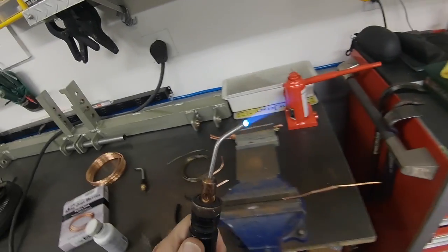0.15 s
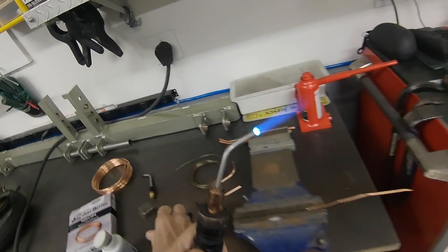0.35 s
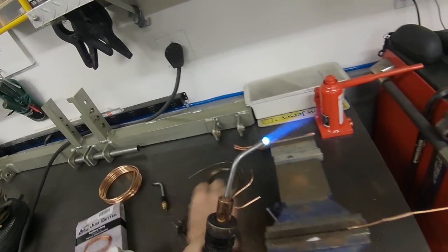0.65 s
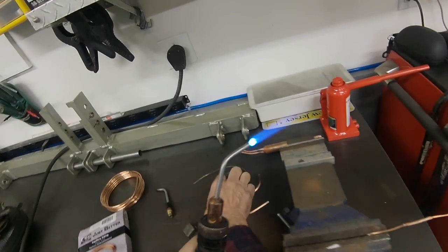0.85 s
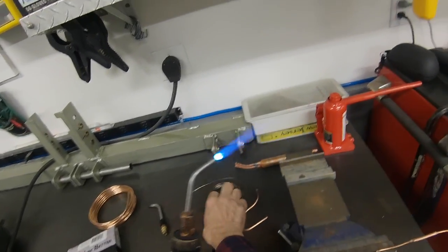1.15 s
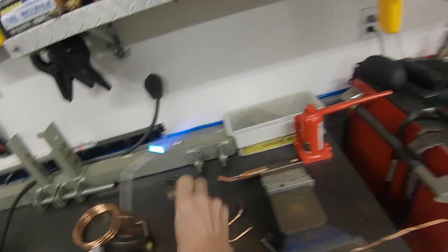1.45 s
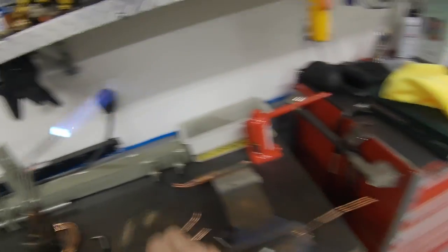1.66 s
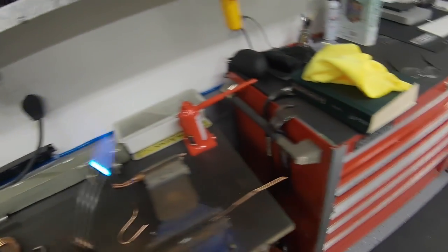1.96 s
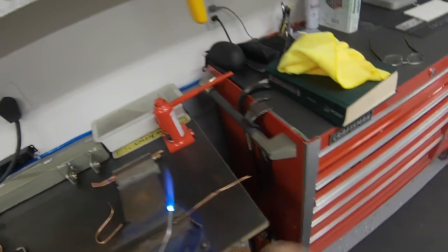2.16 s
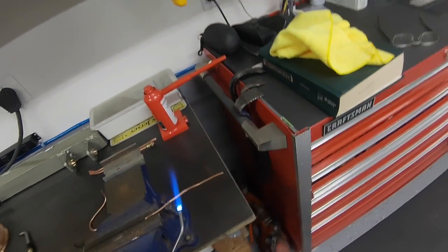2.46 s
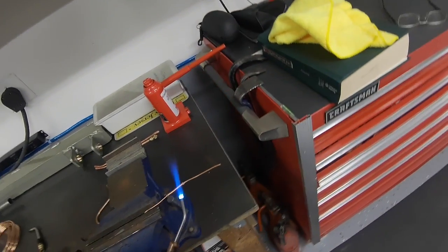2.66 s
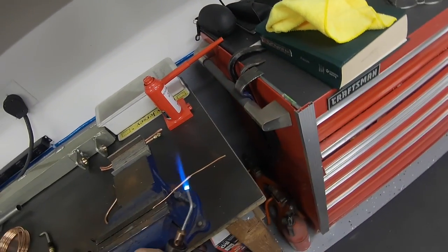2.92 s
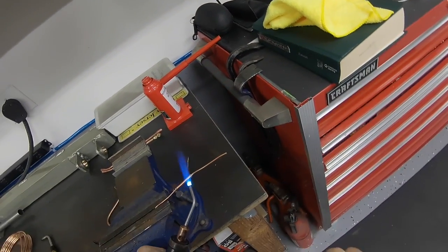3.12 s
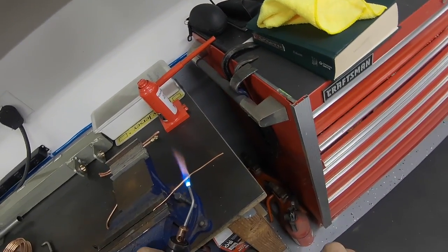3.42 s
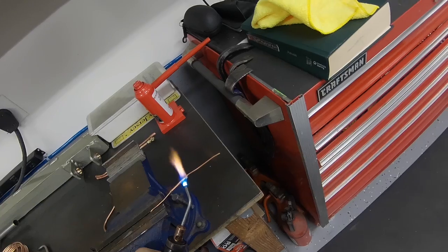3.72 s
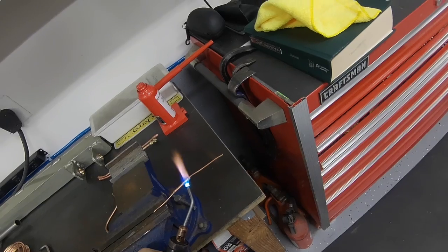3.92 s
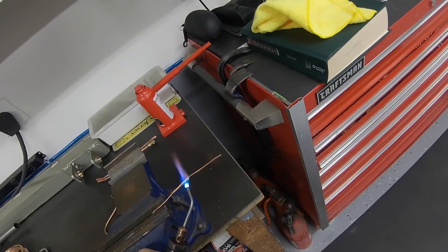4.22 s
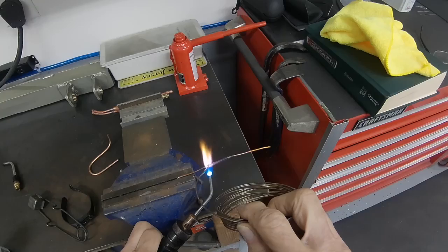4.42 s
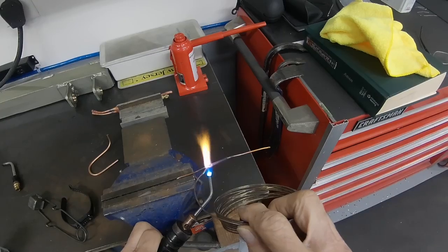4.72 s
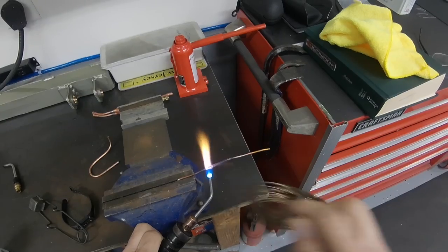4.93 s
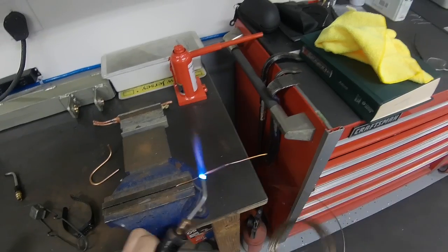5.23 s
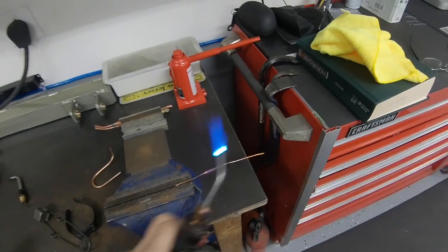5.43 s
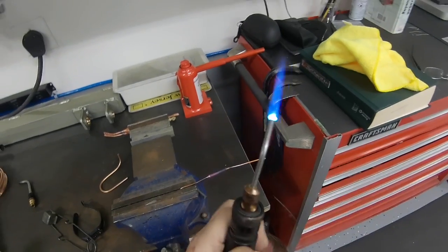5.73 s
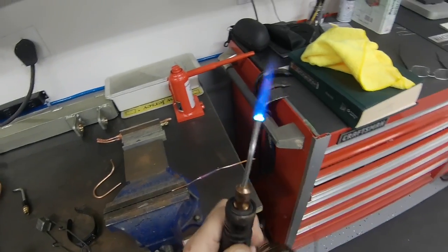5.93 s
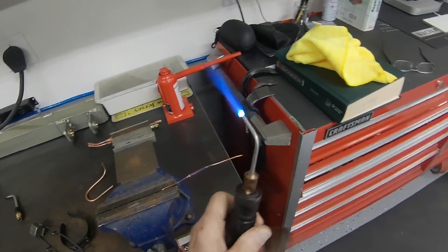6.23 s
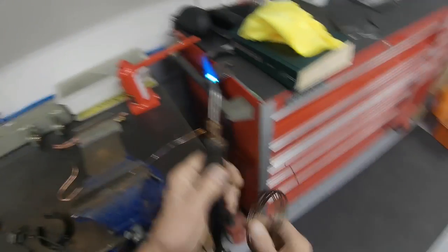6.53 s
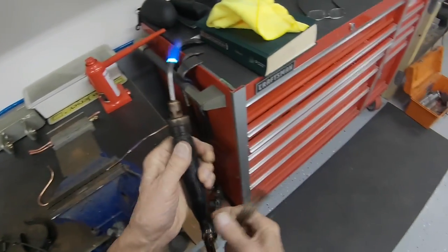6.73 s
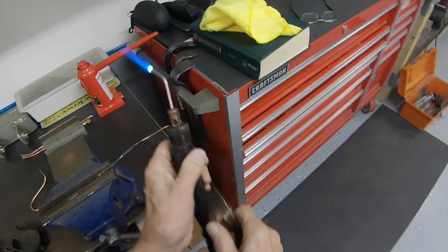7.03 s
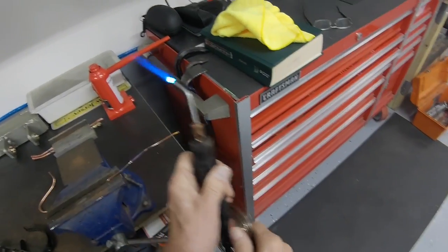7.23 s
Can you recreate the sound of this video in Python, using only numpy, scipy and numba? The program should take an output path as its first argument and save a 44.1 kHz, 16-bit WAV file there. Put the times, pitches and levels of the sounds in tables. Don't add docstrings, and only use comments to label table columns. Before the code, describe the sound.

A hand-held gas torch burns at a steel workshop bench, an arm's length from the listener. Bright rushing hiss and soft roar swell quickly, a single hard knock hits the bench top, and a shaky high whistle emerges and slides lower. The sound then shifts gently in colour as the torch passes over the bench, rises nearer and drops away. Faint low hum underneath; close head-worn stereo pickup with slightly lossy treble.

```python
import sys
import numpy as np
from scipy import signal
from scipy.fft import rfft, irfft, next_fast_len
from scipy.io import wavfile
from scipy.ndimage import uniform_filter1d, map_coordinates
from numba import njit

SR = 44100
rng = np.random.default_rng(int(sys.argv[2]) if len(sys.argv) > 2 else 0)


def nominal_scale(level):
    x = np.asarray(level, float) / 20
    return 10 ** x


def dump(signal):
    limited = np.clip(np.atleast_2d(signal).T, -1, 1)
    pcm = np.round(limited * 32767).astype(np.int16)
    wavfile.write(sys.argv[1], SR, pcm)


N = 325140
SIZE = next_fast_len(N)
TIME = np.arange(N) / SR
FREQ = np.maximum(np.fft.rfftfreq(SIZE, 1 / SR), 1)

# time in seconds, nearness in dB,
# turning of the nozzle to the listener in dB, fullness of the flame in dB.
FLAME_COURSE = [(0, -11.5, 1, -6), (.42, 3.5, 3, -2), (.68, 11, 5, 2.5), (.95, 8, 2.5, 3.5),
                (1.3, 1, 0.5, 5.5), (1.6, 2, 0, 4), (1.85, 1.5, -1, 2.5), (2.15, 1.5, 1.5, 2.5),
                (2.9, -7.5, 0.5, 0.5), (4.3, -6.5, 1.5, -0.5), (4.55, -3, 2.5, -2), (5.1, 0, 4, -3),
                (5.4, -0.5, -0.5, 2), (5.75, 9.5, 0, -0.5), (6.4, 2, 0.5, 0.5), (6.8, -10.5, -4, 0.5),
                (7.3, -4.5, 0.5, 1), (7.37, -20, -2, -4)]
# frequency in Hz, density in dB per Hz.
FLAME_DENSITY = [(150, -81.5), (300, -66.5), (550, -66), (800, -62), (1300, -63.5), (2600, -57),
                 (4000, -64), (5700, -57.5), (7000, -65), (7800, -63.5), (9200, -54.5), (11500, -52.5),
                 (12500, -55.5), (13500, -61), (15600, -70)]
# frequency in Hz, then the shares (ratios)
FLAME_SHARES = [(400, 0.26, -0.19, -0.13), (1110, 0.17, 0.11, 0.56), (5480, 0.69, -1.16, -0.37),
                (9000, 0.12, 0.91, -0.48), (11500, 0.15, 0.99, 0.81), (14500, 0.5, 0.31, 0.35)]
# start in seconds, end in seconds, side minus mid in dB.
OFF_CENTRE_SPELLS = [
    (1.063, 1.57, -4.5),
    (1.725, 2.74, -8),
    (4.917, 7.4, -8),
]
# start in seconds, end in seconds,
# first Hz, last Hz, depth as a ratio up to 1 (below 0 it reflects).
OBSTACLES = [(-.2, .6, 3160, 3320, 0.75), (0.4, 1.45, 12000, 13300, 0.53), (0.2, 1.03, 9700, 9300, 0.52),
             (-.2, .65, 14700, 14100, -1.1), (0.91, 1.5, 14600, 15500, .6), (0.753, 1.54, 4780, 5600, 0.87),
             (1.3, 2.2, 13900, 13900, 0.7), (1.6, 2.46, 9400, 8400, 0.42), (1.86, 4.497, 5500, 5630, 0.47),
             (2.24, 3.86, 13400, 16000, .85), (3.198, 5.304, 11800, 11550, 0.43),
             (4.4, 6.7, 4820, 4650, 0.52), (5.46, 6.0, 10400, 9800, 0.39), (6.16, 6.66, 9000, 11500, 0.12),
             (6.6, 7.4, 9300, 8900, 0.4), (6.94, 7.5, 15000, 12000, .5)]
# time in seconds, bench echo lag in ms,
# bench echo share from 0 to 1, wall echo lag in ms.
REFLECTORS = [(0, 1, 0, 4.9), (1.2, 0.57, 0.21, 3.65), (1.75, .8, 0, 4.4), (2.3, 0.75, 0.1, 4.8),
              (2.8, 0.72, 0.17, 5.5), (4.4, 0.54, 0.2, 5.48), (4.5, 0.66, 0.15, 5), (5.25, 0.79, 0.3, 4.6),
              (5.5, 1, .25, 4.76), (6.4, 1.01, 0.14, 4.26), (7.37, 1.23, 0.08, 4.27)]
# time in seconds, pitch in Hz, level in dB.
WHISTLE_COURSE = [(0, 4230, -36), (0.33, 4250, -31), (0.66, 4060, -14.4), (1.09, 3690, -13),
                  (1.15, 3545, -14), (1.54, 3566, -9.5), (1.79, 3370, -20.5), (2.0, 3625, -11.5),
                  (2.2, 3550, -13.5), (3.15, 3458, -16.3), (4.44, 3510, -17.5), (4.49, 3285, -14.5),
                  (5.42, 3275, -14), (5.53, 3335, -18.5), (6.1, 3245, -18), (6.55, 3330, -19),
                  (7.1, 3270, -16.3), (7.37, 3300, -21)]
# start in seconds, hold in seconds,
# release in seconds, pitch in Hz, level in dB.
EDGE_ROARS = [
    (-.1, 0.15, 3.9, 1820, -30),
    (4.428, 0.083, 3.0, 1765, -30),
    (5.45, .8, 0.78, 1680, -28),
    (6.503, .9, .1, 1780, -33),
]
# frequency in Hz, level in dB.
HUM_TONES = [(63, -49.5), (126.5, -61.5)]
# frequency in Hz, density in dB per Hz.
RUMBLE_DENSITY = [(20, -70.5), (60, -66.5), (130, -77.5), (200, -99.5), (400, -82)]
# frequency in Hz, level in dB, time to fall 60 dB in seconds.
BENCH_MODES = [(130, -16.5, 0.27), (338, -16, 0.094), (542, -36, .15), (873, -12.5, 0.16),
               (1710, -27, 0.025), (2640, -7, 0.052)]
# highest moment in seconds,
# half length in seconds, echo lag in ms, echo share as a ratio.
CHEST_LIFTS = [
    (5.84, .7, .405, -.4),
]
# frequency in Hz, half width in Hz.
NOTCHES = [(4490, 159), (6503, 235), (7386, 336), (8236, 460), (9798, 338)]
# frequency in Hz, density in dB per Hz below which a line vanishes.
DROPOUT_CURVE = [(3000, -90), (3800, -68), (4300, -65), (4700, -68), (5700, -67), (6900, -72), (7400, -75),
                 (8300, -73), (9600, -71), (12000, -72), (14000, -71), (15500, -73)]


def curves(table):
    s, *columns = np.transpose(table)
    return [np.interp(TIME, s, c) for c in columns]


def noise(density):
    hz, db = np.transpose(density)
    gain = nominal_scale(np.interp(np.log(FREQ), np.log(hz), db))
    return rfft(rng.standard_normal(SIZE)) * gain * np.sqrt(SR / 2)


def walk(rate):
    k = max(int(SR / rate), 2)
    w = uniform_filter1d(uniform_filter1d(rng.standard_normal(N), k), k)
    return w / w.std()


def swell(start, attack, hold, release):
    t = TIME - start
    return np.clip(t / attack, 0, 1) * nominal_scale(-30 * np.maximum(t - attack - hold, 0) / release)


def cuts(hz):
    return np.prod([(hz - f) ** 2 / ((hz - f) ** 2 + w ** 2) for f, w in NOTCHES], axis=0)


@njit
def resonate(x, hz, width):
    y, band, low = np.empty(len(x)), 0., 0.
    for i in range(len(x)):
        g, k = np.tan(np.pi * hz[i] / SR), width / hz[i]
        v = (band + g * (x[i] - low)) / (1 + g * (g + k))
        band, low, y[i] = 2 * v - band, low + 2 * g * v, k * v
    return y


def breath(hz, width):
    y = resonate(resonate(rng.standard_normal(N), hz, width), hz, width)
    return y / y.std()


def echo(x, lag_ms, share, size):
    at = (TIME - lag_ms / 1000) * SR
    late = map_coordinates(uniform_filter1d(x, size=size), [at], mode="mirror")
    return x + share * late


def flame():
    near_db, turn_db, full_db = curves(FLAME_COURSE)
    part_hz, near_share, turn_share, full_share = np.transpose(FLAME_SHARES)
    mid = noise(FLAME_DENSITY)
    side = noise(FLAME_DENSITY) / (1 + ((FREQ - 11600) / 1250) ** 8)
    place = 3 * np.log2(FREQ / 100)
    part_place = 3 * np.log2(part_hz / 100)
    out = np.zeros((2, N))
    for k in range(23):
        window = np.clip(1 - abs(np.clip(place, 0, 22) - k), 0, 1)
        db = np.interp(k, part_place, near_share) * near_db
        db = db + np.interp(k, part_place, turn_share) * turn_db
        db = db + np.interp(k, part_place, full_share) * full_db
        db = db + 0.96 * walk(7.4) + min(1.2, 12 / (k + 1)) * walk(36)
        out[0] += nominal_scale(db) * irfft(mid * window, SIZE)[:N]
    apart = sum(nominal_scale(db) * swell(start, 0.013, end - start, .03) for start, end, db in OFF_CENTRE_SPELLS)
    out[1] = apart * nominal_scale(2.0 * walk(19)) * irfft(side, SIZE)[:N]
    ports = irfft(noise([(100, -86), (700, -68.5), (1500, -73.5)] + DROPOUT_CURVE[2:]), SIZE)[:N]
    out[1] += nominal_scale(-1 + 2.5 * (TIME < 1.2) + 1.0 * walk(20)) * ports
    return out


def shadows(x):
    fade_s, sharpness, wobble = 0.11, 6.3, 0.0059
    for start, end, from_hz, to_hz, depth in OBSTACLES:
        hz = np.interp(TIME, [start, end], [from_hz, to_hz]) * (1 + wobble * walk(8.6))
        inside = np.clip(np.minimum(TIME - start, end - TIME) / fade_s, 0, 1)
        x = x - min(depth, 1) * inside * resonate(x, hz, from_hz / sharpness)
    return x


def bench_and_wall(x):
    lag_ms, share, wall_ms = curves(REFLECTORS)
    x = echo(x, lag_ms, -np.clip(share, 0, .9), size=4)
    return echo(x, wall_ms, 0.42, size=1)


def hands(x):
    return echo(x, 1.5 + 0.073 * walk(1.6), 0.17, size=1)


def second_mode(whistle_hz):
    first_hz = np.maximum(5460 - 1730 * TIME, 4700)
    first = nominal_scale(-21) * swell(start=-0.09, attack=0.18, hold=0.22, release=0.33) * breath(first_hz, 280.0)
    first = first / np.maximum(cuts(first_hz), .3)
    under = nominal_scale(-26.5) * swell(start=1.88, attack=0.4, hold=3.1, release=2.2)
    return first + under * breath(0.843 * whistle_hz, 430.0)


def whistle():
    hz, db = curves(WHISTLE_COURSE)
    hz = hz + 11 * walk(3.966) * np.clip(TIME - 2, 0, 1)
    db = db + .5 * walk(11)
    shake = np.interp(TIME, [0, .4, .5, 1.0, 1.2, 5.4, 5.5], [1.305, 1.481, 0.46, 0.89, 1.1, 1.1, 1.107])
    shaken_hz = hz + shake * (15 * walk(60) + 105 * np.tanh(walk(350)))
    phase = 2 * np.pi * np.cumsum(shaken_hz) / SR
    strength = nominal_scale(0.49 * walk(150) + 2.73 * walk(395))
    tone = resonate(resonate(strength * np.sin(phase), hz, 450.), hz, 450.)
    octave_db = np.interp(TIME, [.6, .75, 1.0, 1.2], [-2, -11.5, -6, -22.5])
    octave = nominal_scale(octave_db) * strength * np.sin(2 * phase)
    voice = 0.79 * tone / tone.std() + octave + 0.32 * shake * breath(hz, 590.0)
    side = nominal_scale(-22.5 + 5.7 * walk(10.4)) * resonate(np.roll(voice, 260), hz, 128.0)
    out = np.array([voice, side]) * nominal_scale(db + 1.5) / np.maximum(cuts(hz), .3)
    out[0] += second_mode(hz)
    return out


def edge_roar():
    return sum(nominal_scale(db) * swell(start, 0.056, hold, release) * breath(np.full(N, 1. * hz), 320.0)
               for start, hold, release, hz, db in EDGE_ROARS)


def workshop():
    out = irfft(noise(RUMBLE_DENSITY), SIZE)[:N]
    for hz, db in HUM_TONES:
        phase = 2 * np.pi * np.cumsum(hz + 1.12 * walk(8.8)) / SR
        out = out + np.sqrt(2) * nominal_scale(db + 0.5 * walk(11)) * np.sin(phase)
    return out


def knock():
    t = np.maximum(TIME - .614, 0)
    ring = sum(nominal_scale(db - 60 * t / t60) * np.sin(2 * np.pi * hz * t) for hz, db, t60 in BENCH_MODES)
    rattle_decay = 0.25 * nominal_scale(-60 * t / 0.15) + 0.17 * nominal_scale(-60 * t / 0.3)
    rattle = breath(np.full(N, 900.), 2500.0) * rattle_decay
    thud = breath(np.full(N, 125.), 70.) * .02 * nominal_scale(-60 * t / 1.6)
    return nominal_scale(-4) * (ring + rattle + thud) * np.clip(t / 0.00079, 0, 1)


def chest_echo(x):
    treble_hz, shrink = 12500., .3
    for top, half, lag_ms, share in CHEST_LIFTS:
        away = abs(np.clip((TIME - top) / half, -1, 1)) ** 2.6
        treble = resonate(x, np.full(N, treble_hz), treble_hz)
        present = np.clip(4 * (1 - away), 0, 1)
        x = x - treble + echo(treble, lag_ms * (1 - shrink * away), share * present, size=1)
    return x


def scene():
    mid, side = flame()
    mid = hands(shadows(bench_and_wall(chest_echo(mid))))
    tone, tone_side = whistle()
    near = workshop() + knock()
    mid = mid + edge_roar() + tone + near
    side = side + tone_side + nominal_scale(-26) * np.roll(near, 90)
    return np.array([mid + side, mid - side])


def drop_quiet_lines(x):
    mid_side = np.array([x[0] + x[1], x[0] - x[1]]) / 2
    hz, _, lines = signal.stft(mid_side, SR, nperseg=2048, scaling="psd")
    power = abs(lines) ** 2 * 2
    frame_power = power[0].sum(axis=0)
    loud_db = 10 * np.log10(frame_power / np.median(frame_power) + 1e-9)
    mask_db = np.interp(hz, *np.transpose(DROPOUT_CURVE))[:, None] + .7 * loud_db
    side_mask_db = np.interp(hz, *np.transpose(DROPOUT_CURVE[1:]))[:, None] + 3
    heard = np.array([uniform_filter1d(power[0], size=3, axis=0) > nominal_scale(mask_db) ** 2,
                      uniform_filter1d(power[1], size=17, axis=0) > nominal_scale(side_mask_db) ** 2])
    mid, side = signal.istft(lines * heard, SR, nperseg=2048, scaling="psd")[1][:, :N]
    return np.array([mid + side, mid - side])


def low_pass(x):
    return signal.sosfilt(signal.butter(12, 15770, fs=SR, output="sos"), x)


def record(dry):
    cut = irfft(rfft(dry, SIZE) * cuts(FREQ), SIZE)[:, :N]
    mix = drop_quiet_lines(np.clip(cut, -.97, .97))
    return low_pass(mix)


dry = scene()
out = record(dry)
dump(out)
```